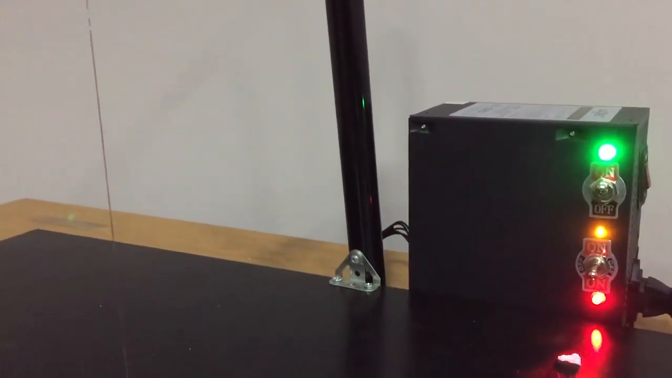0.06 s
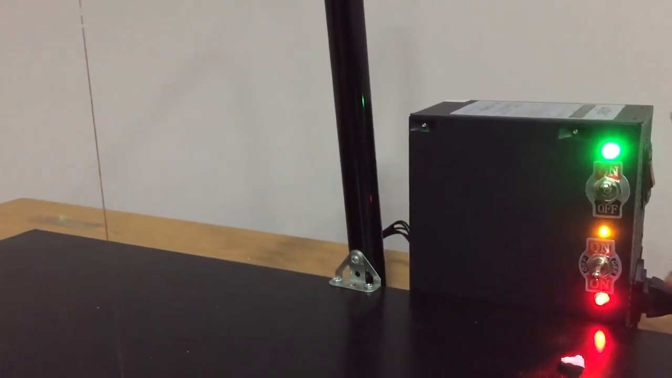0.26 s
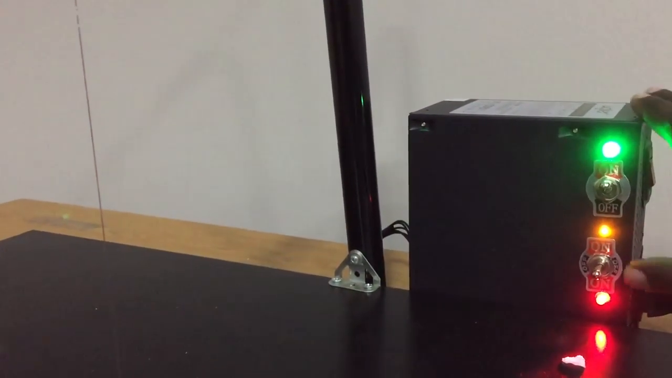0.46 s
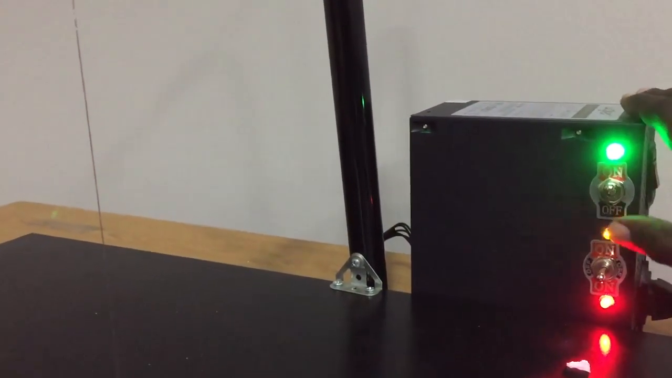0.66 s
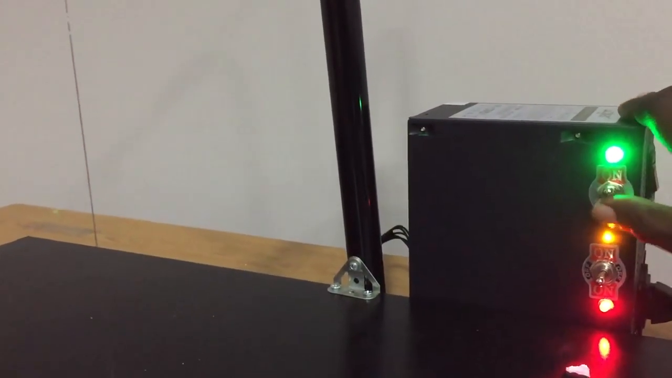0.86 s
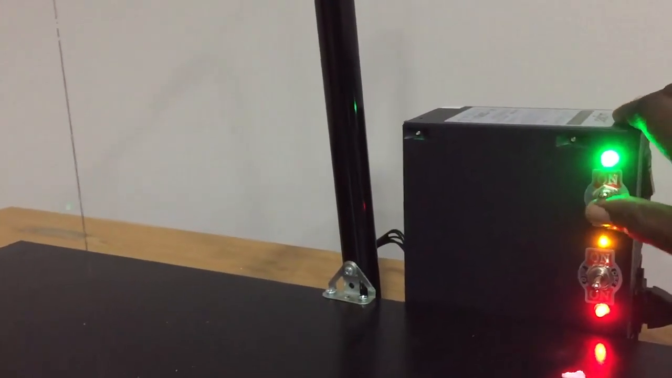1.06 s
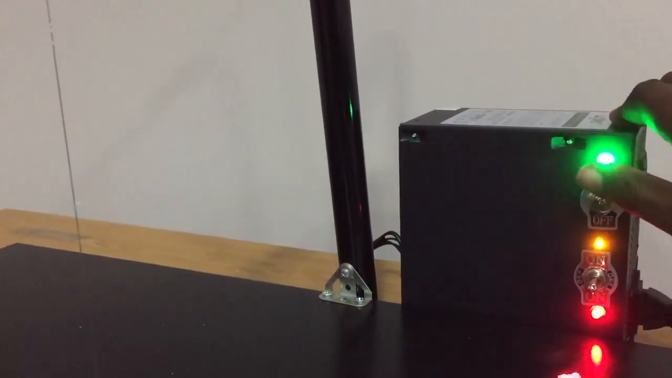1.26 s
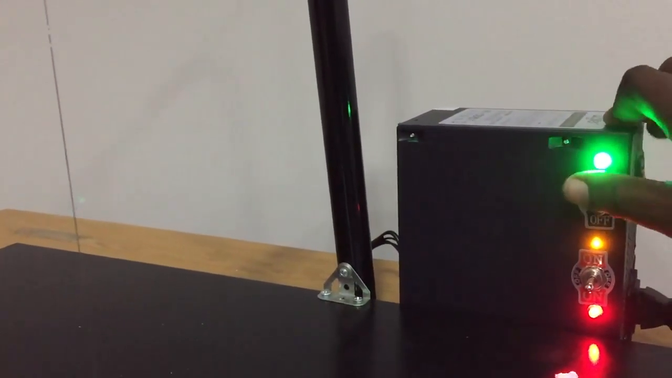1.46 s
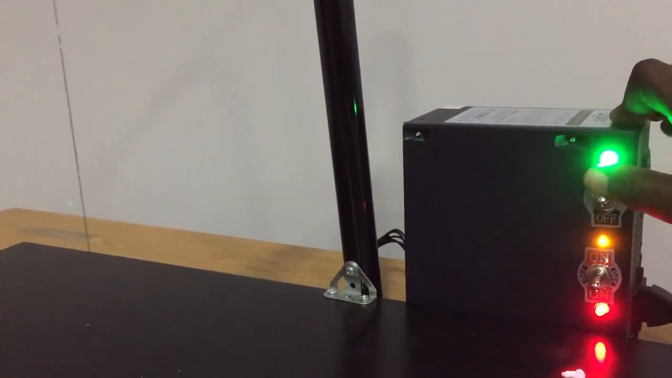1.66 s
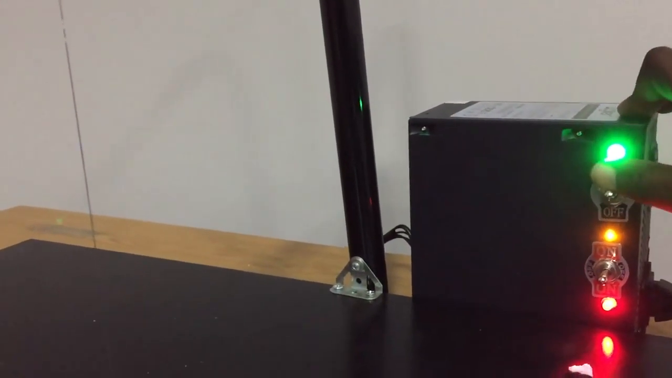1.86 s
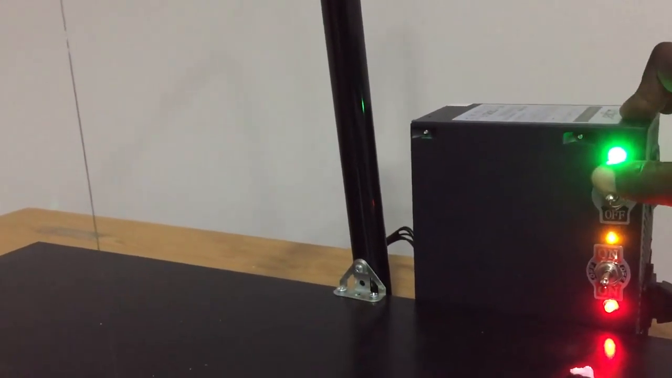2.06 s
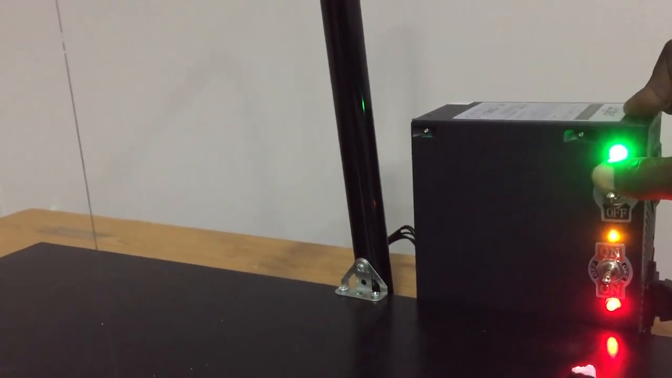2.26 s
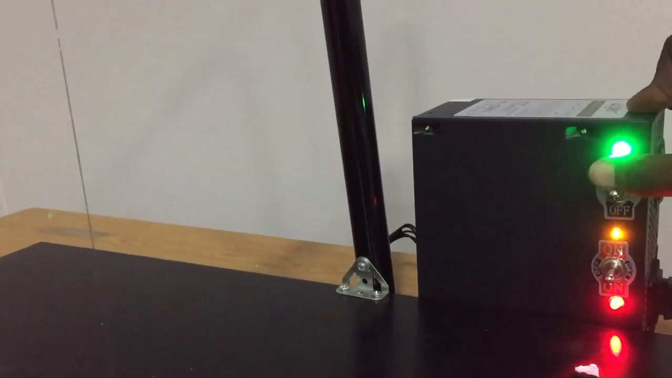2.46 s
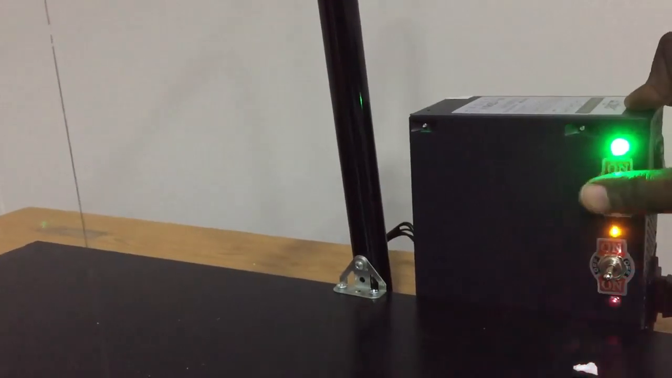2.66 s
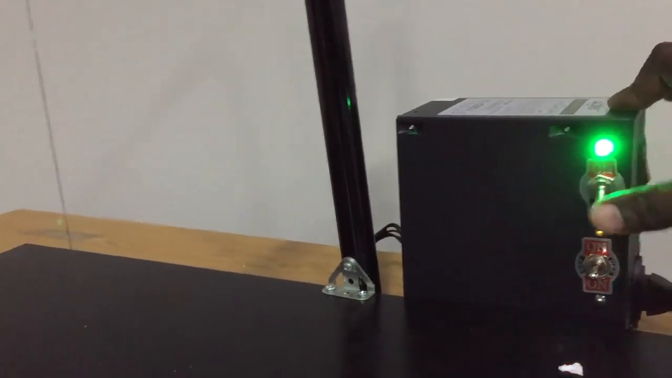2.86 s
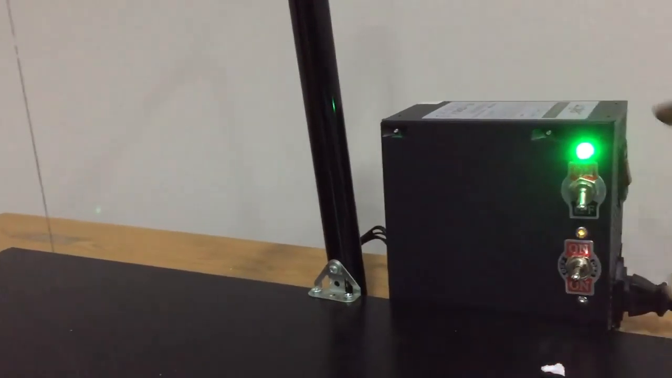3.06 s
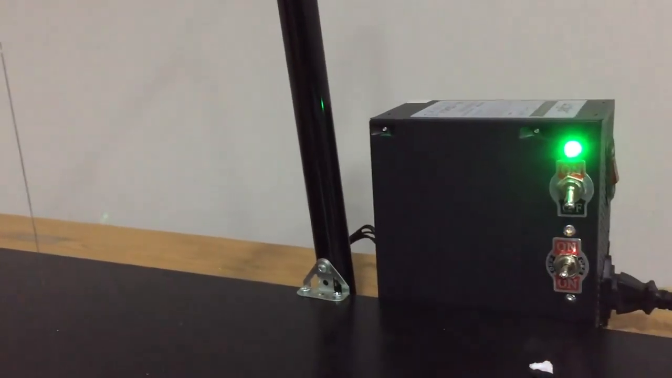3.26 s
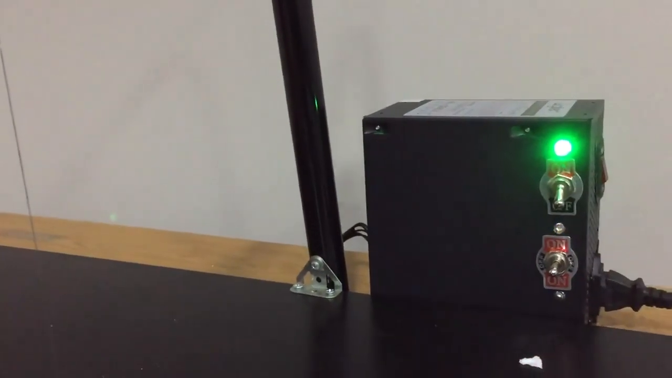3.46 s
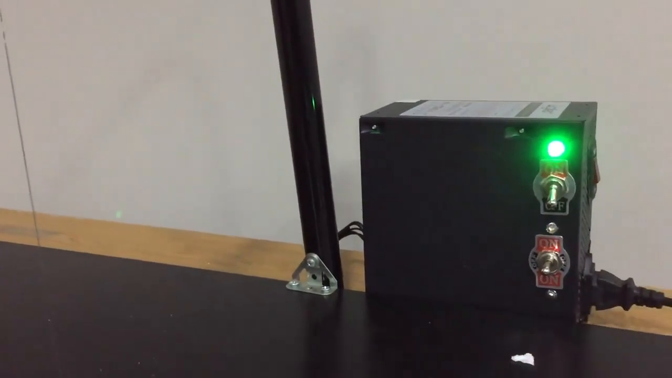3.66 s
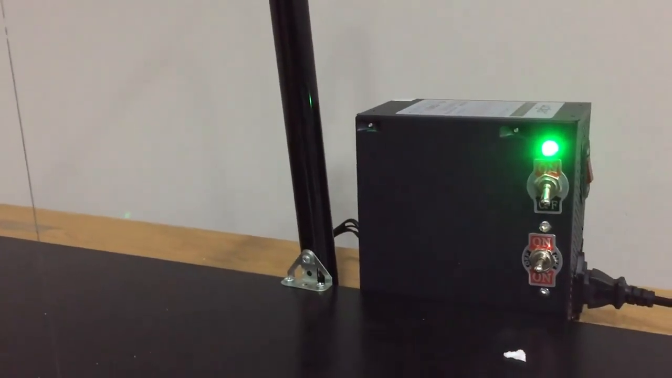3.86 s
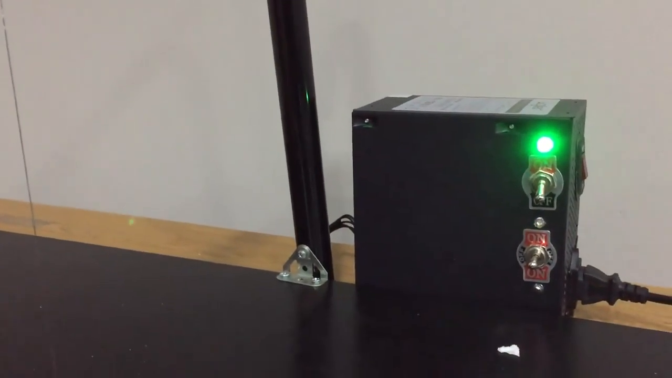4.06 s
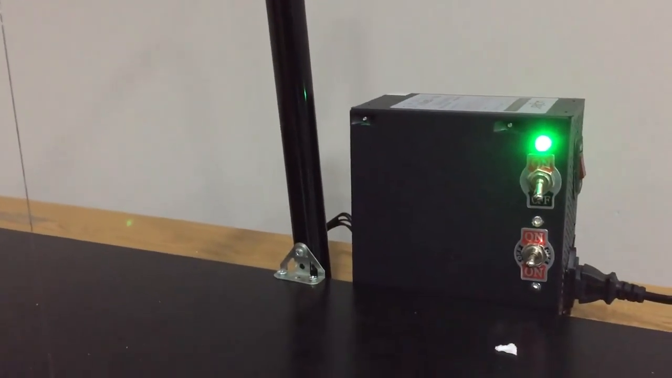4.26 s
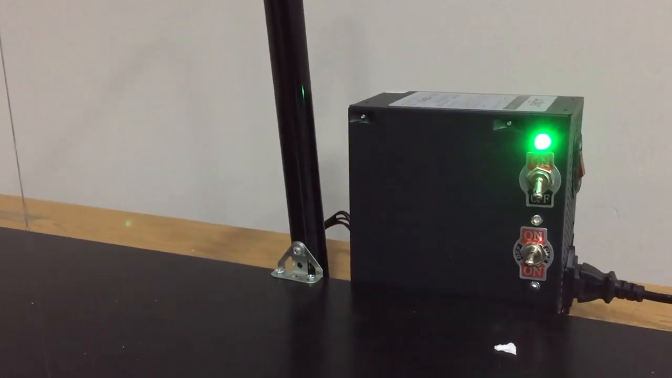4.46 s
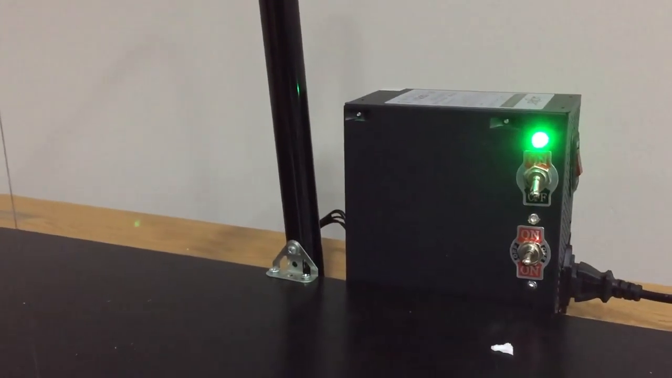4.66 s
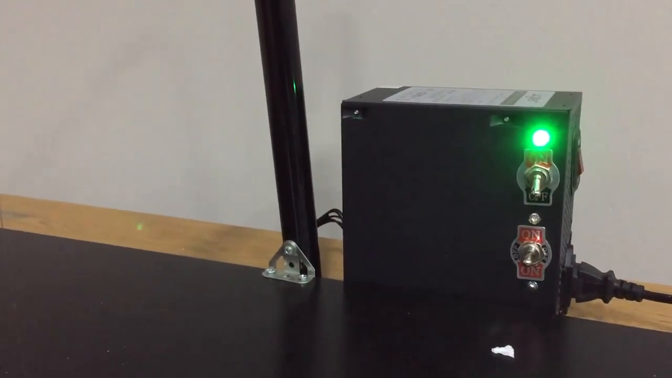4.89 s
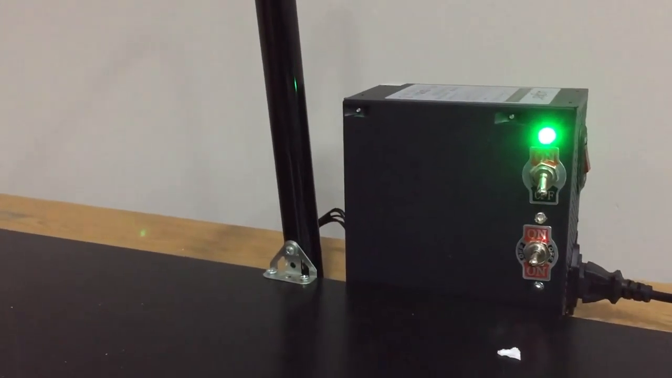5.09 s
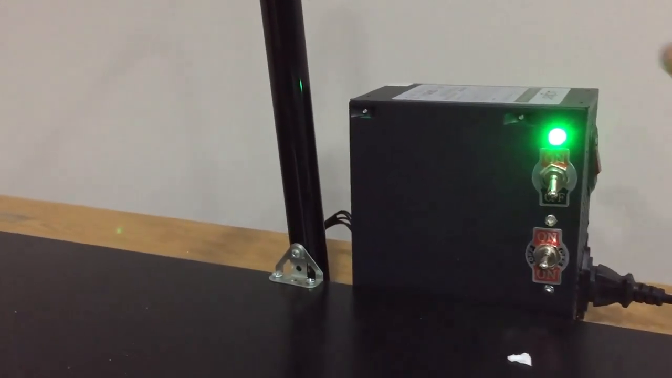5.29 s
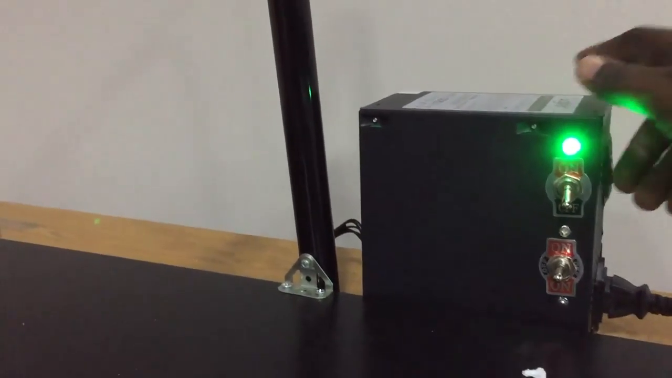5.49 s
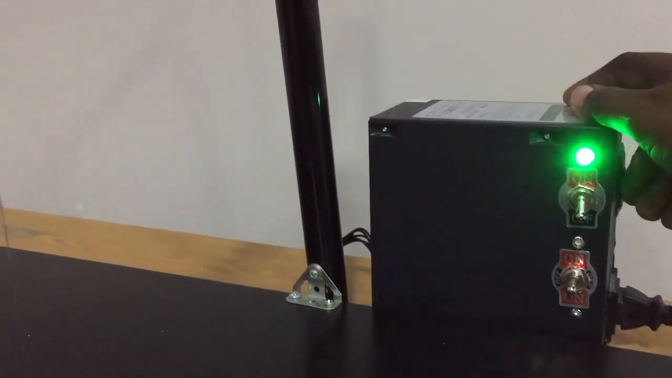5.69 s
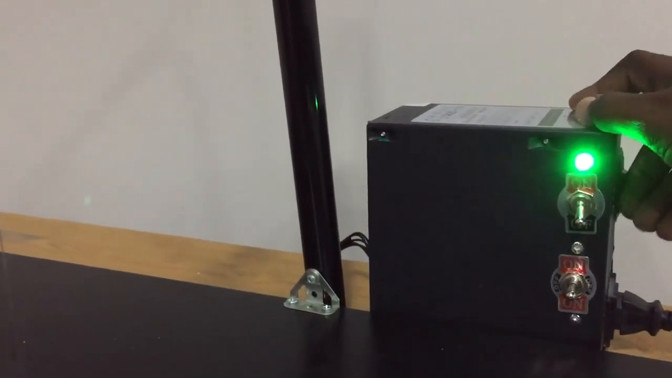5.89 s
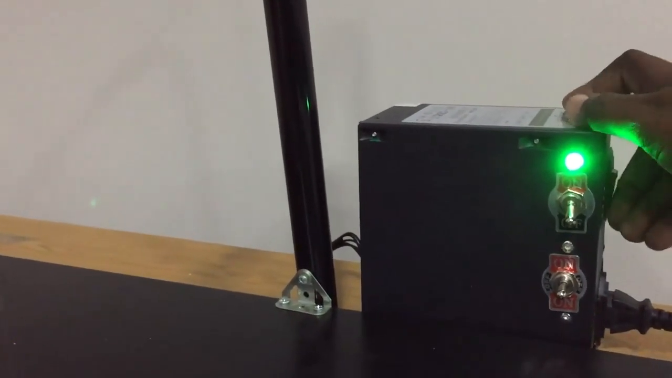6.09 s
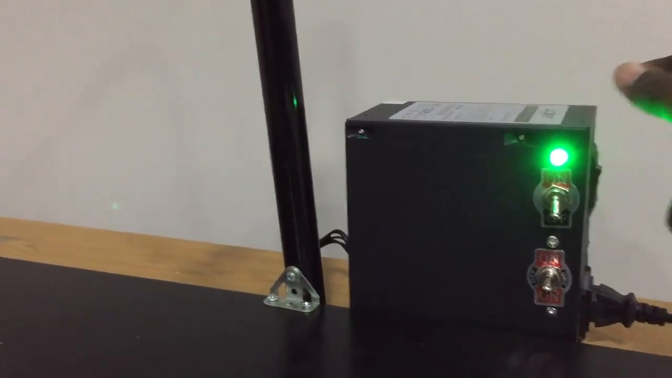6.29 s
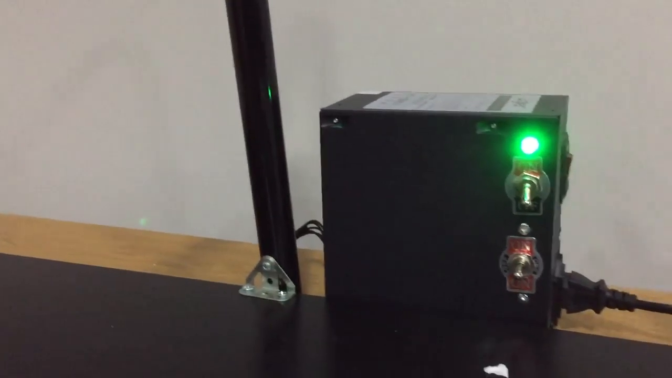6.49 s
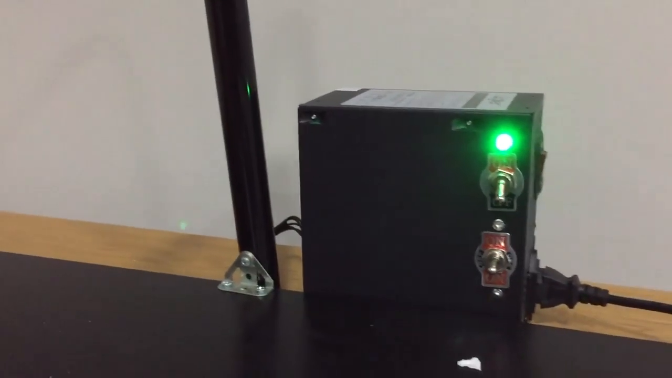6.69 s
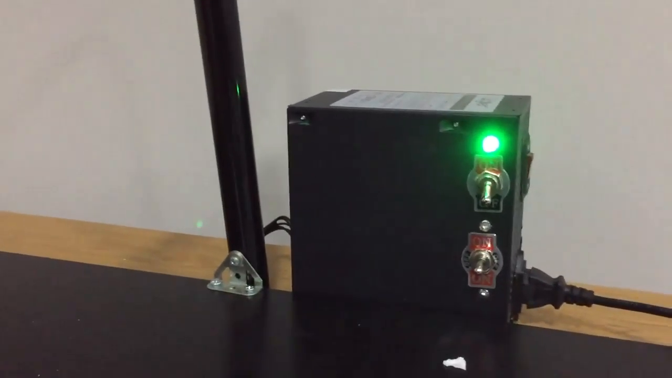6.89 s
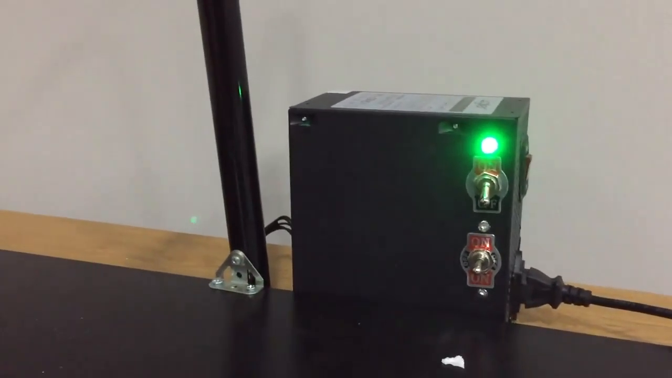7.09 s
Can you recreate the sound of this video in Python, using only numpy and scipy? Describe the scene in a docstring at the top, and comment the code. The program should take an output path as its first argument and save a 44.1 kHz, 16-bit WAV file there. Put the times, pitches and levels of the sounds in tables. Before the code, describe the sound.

A toggle switch snaps off a small power supply, its faint fan winds down, and a second switch clicks over low hum.

```python
"""A bare, ringing room, one microphone near a bench power supply made from a computer supply.
After a brief rustle a finger feels for the front toggle and snaps it off, and the fan coasts down;
later it clicks the rocker on the far side. Each switch is a spring throwing its contacts over,
and each blow knocks the steel case. Mains hum and the room's low rumble carry on underneath."""
import sys
import numpy as np
from scipy import signal
from scipy.fft import rfft, irfft
from scipy.io import wavfile

SR = 44100
rng = np.random.default_rng(int(sys.argv[2]) if len(sys.argv) > 2 else 0)


def master_out(mix):
    """Clip the mix to full scale and print it as 16-bit PCM to the path in sys.argv[1]."""
    frames = np.transpose(np.atleast_2d(mix))
    ceiling = np.clip(frames, -1, 1)
    pcm = np.round(ceiling * 32767).astype(np.int16)
    wavfile.write(sys.argv[1], SR, pcm)


N = 314863
T = np.arange(N) / SR
BAND_LIMIT_HZ = 15900


# blows inside the front toggle: start_s, snap_db, snap_decay_s, knock_db
TOGGLE_BLOWS = [(2.7427, -20, 0.00067, -15), (2.7447, -9.5, .0016, -11), (2.7462, -13.5, 0.001, -10),
                (2.7480, -19, .002, 3)]
# its snap, straight to the microphone: frequency_hz, level_db
TOGGLE_SPECTRUM = [(60, -30.5), (200, -13), (1200, -0.5), (2800, -0.5), (4300, 1), (6600, 3), (8200, -4.5),
                   (9500, 1), (15500, -3)]
# its echo, back from the walls: frequency_hz, level_db
TOGGLE_ECHO_SPECTRUM = [(53, -42), (90, -12), (210, 3), (290, -10), (467, -8.5), (510, -19.5), (568, -10),
                        (821, -14), (1040, -8), (1640, -11.5), (1790, -12), (2430, -10.5), (3080, -21.5),
                        (6580, -24.5), (16000, -37)]

def toggle(room_db=-17.5):
    """The front toggle snaps over, facing the microphone, and the room rings."""
    click = switch_blows(TOGGLE_BLOWS, TOGGLE_SPECTRUM)
    echo = snap_echo(TOGGLE_BLOWS, TOGGLE_ECHO_SPECTRUM, level_db=-35, build_s=0.005,
                     t60_scale=1.062, linger_db=3.5, linger_s=0.38)
    return click + amp(room_db) * room(click) + echo


# blows inside the rear rocker: start_s, snap_db, snap_decay_s, knock_db
ROCKER_BLOWS = [(6.0553, -13, 0.0017, -27), (6.0565, -11.5, 0.00159, -17.5), (6.0583, -27.5, 0.0035, -16.5)]
# its snap, from behind the case: frequency_hz, level_db
ROCKER_SPECTRUM = [(60, -48), (200, -16), (1000, -10), (2100, -11), (3100, 5), (4600, -4), (6300, 0),
                   (8500, -4.5), (11000, -6.5), (14800, -1)]
# its echo, back from the walls: frequency_hz, level_db
ROCKER_ECHO_SPECTRUM = [(88, -44), (150, -13), (217, 0), (309, -13), (383, -5), (504, -30), (675, -10.5),
                        (774, -16.5), (1630, -9.5), (2920, -6), (4410, -18.5), (5790, -9.5), (10400, -13.5),
                        (12900, -7.5), (16000, -21)]

def rocker(room_db=-17.5):
    """The rear rocker clicks facing away from the microphone, so its echo builds more slowly."""
    click = switch_blows(ROCKER_BLOWS, ROCKER_SPECTRUM)
    echo = snap_echo(ROCKER_BLOWS, ROCKER_ECHO_SPECTRUM, level_db=-44, build_s=0.012,
                     t60_scale=0.87, linger_db=1.5, linger_s=0.2)
    return click + amp(room_db) * room(click) + echo


def switch_blows(blows, spectrum):
    """Switch parts strike a few ms apart: each blow is a snap of noise and a knock on the case."""
    out = noise(spectrum) * bursts([row[:3] for row in blows])
    for start_s, _, _, knock_db in blows:
        add(out, start_s, amp(knock_db) * case_ring())
    return out


# steel case modes, ending with the thin cover's faint, long ring: pitch_hz, level_db, t60_s
CASE_MODES = [(112, -47.5, .2), (186.56, -27, 0.13), (226.3, -30, .4), (263, -37.5, 0.043),
              (362, -31.5, 0.086), (398, -28, .12), (636, -29.5, .05), (694, -21.5, .085),
              (925, -30.5, 0.15), (975, -22.5, 0.083), (1106, -27.5, .07), (1261.7, -20.5, 0.06),
              (1330, -28, 0.052), (1683, -21, .085), (1900, -35.5, 0.14), (2270, -38, 0.13),
              (2436, -26.5, .045), (3370, -36, 0.062), (4550, -38, 0.042), (5340, -34.5, 0.021),
              (5570, -37, .06), (6780, -28, 0.034), (7420, -36, .05), (1286, -44, 1), (1680, -46.5, 0.96),
              (2490, -47, 1), (6764, -51.5, 1)]
# clatter of the panels: frequency_hz, level_db
PANEL_SPECTRUM = [(60, -21), (170, 0), (500, -9.5), (1000, 2), (2200, -2.5), (3300, -9), (6000, -18),
                  (10000, -30), (16000, -36)]

def case_ring(panel_db=-17, panel_decay_s=0.0047):
    """One blow on the case: its clear modes plus a short clatter of dense panel modes."""
    t = T[:SR // 2]
    modes = sum((-1) ** k * amp(db) * np.exp(-np.log(1000) * t / t60) * np.sin(2 * np.pi * hz * t)
                for k, (hz, db, t60) in enumerate(CASE_MODES))
    clatter = unit(colour(rng.standard_normal(len(t)), PANEL_SPECTRUM))
    return modes + amp(panel_db) * clatter * np.exp(-t / panel_decay_s)


# the toggle's lever taking up its slack: start_s, snap_db, snap_decay_s, knock_db
LEVER_BLOWS = [(1.4395, -30.5, 0.0029, -42), (1.4463, -42, 0.0026, -36)]
# the duller snap of those blows: frequency_hz, level_db
LEVER_SPECTRUM = [(88, -26), (200, -4), (380, 8.5), (520, -9), (972, 3.5), (1510, -6), (1730, -3.5),
                  (2810, -5.5), (3340, 0.5), (3670, -13), (6430, -19.5), (15000, -44)]

def lever(room_db=-13, desk_db=-9, desk_decay_s=0.015):
    """The lever taps its stop without switching; the nearby desk and wall scatter the tap back."""
    tap = switch_blows(LEVER_BLOWS, LEVER_SPECTRUM)
    t = T[:SR // 5]
    scatter = rng.standard_normal(len(t)) * np.exp(-t / desk_decay_s)
    near_echo = signal.fftconvolve(tap, scatter / np.linalg.norm(scatter))[:N]
    return tap + amp(desk_db) * near_echo + amp(room_db) * room(tap)


# soft fingertip thuds on lever and case: start_s, level_db, decay_s, pitch_hz
FINGERTIP_THUDS = [(.924, -42, 0.0056, 300), (1.603, -52, 0.015, 540), (2.364, -53, 0.029, 420),
                   (2.565, -53, 0.0081, 350), (2.882, -38.5, 0.013, 370), (5.731, -46, 0.0043, 170),
                   (5.919, -40.5, 0.0057, 310), (5.967, -49.5, 0.0093, 190)]
# fingernail ticks and grazes: start_s, level_db, decay_s, pitch_hz
NAIL_TICKS = [(1.595, -67.5, 0.016, 6500), (1.992, -76, .06, 11000), (2.951, -30, 0.0038, 2800),
              (3.401, -65.5, 0.009, 7000), (5.777, -66.5, .01, 6700)]
# skin squeaks as the hand grips the case: start_s, level_db, pitch_hz
SKIN_SQUEAKS = [(5.776, -61, 2250), (5.889, -62.5, 1793)]

def fingers(room_db=-12):
    """Low thuds from the fingertip, high ticks from the nail, narrow squeaks from gripping skin."""
    out = np.zeros(N)
    for start_s, db, decay_s, hz in FINGERTIP_THUDS:
        add(out, start_s, contact(db, hz, decay_s, octaves=0.92, case_db=-13))
    for start_s, db, decay_s, hz in NAIL_TICKS:
        add(out, start_s, contact(db, hz, decay_s, octaves=1.3, case_db=-14))
    for start_s, db, hz in SKIN_SQUEAKS:
        add(out, start_s, contact(db, hz, decay_s=0.013, octaves=0.17, case_db=-20))
    return out + amp(room_db) * room(out)


def contact(db, hz, decay_s, octaves, case_db, damping_s=0.028):
    """One short scraping contact in a band around hz, which also rings the case."""
    t = T[:SR // 5]
    edges_hz = np.minimum(hz * 2 ** (np.array([-0.5, 0.5]) * octaves), BAND_LIMIT_HZ)
    scrape = rng.standard_normal(len(t)) * np.exp(-t / decay_s)
    push = signal.lfilter(*signal.butter(2, edges_hz, "band", fs=SR), scrape)
    push *= np.sqrt(decay_s * SR / 2) / np.linalg.norm(push)  # energy grows with the contact time
    ring = signal.fftconvolve(push, case_ring())[:len(t)] * np.exp(-t / damping_s)  # skin damps steel
    return amp(db) * (push + amp(case_db) * unit(ring) * np.std(push))


# resonances of the sliding hand: pitch_hz, width_hz, level_db
SLIDE_RESONANCES = [(2630, 34, 6.5), (3210, 66, -3), (4060, 320, 1.5), (5520, 280, -2), (6150, 200, -1),
                    (6830, 130, 6), (7560, 220, 0), (9060, 870, -5.5), (13400, 1900, -10),
                    (15500, 550, -3.5)]
# rasp of its catches: frequency_hz, level_db
CATCH_SPECTRUM = [(300, -39), (1200, -6), (1900, -18), (2900, -10), (3300, 9), (4000, 3), (4800, -6.5),
                  (6000, -10), (8000, -3), (9200, -14), (10500, -6.5), (13000, -22), (15500, -8.5)]

def rustle(press_s=0.24, ease_s=0.34, lift_s=0.433, lift_decay_s=0.018,
           slide_db=-60.5, ease_db=-2, grain_db=1.0, room_db=-17):
    """Friction grains pass through resonances as the hand slides, presses, eases and lifts off."""
    grains = rng.standard_normal(N) * amp(grain_db * drift(270))
    slide = sum((-1) ** k * amp(db) * signal.lfilter(*signal.iirpeak(hz, hz / width, fs=SR), grains)
                for k, (hz, width, db) in enumerate(SLIDE_RESONANCES))
    lift_off = np.exp(-np.maximum(T - lift_s, 0) / lift_decay_s)
    slide = unit(slide) * amp(slide_db + ease_db * (T > ease_s)) * lift_off
    slips = colour(grains * catches(press_s, ease_s), CATCH_SPECTRUM)
    slips /= np.std(colour(grains, CATCH_SPECTRUM))
    return slide + slips + amp(room_db) * room(slide + slips)


# the hand's sharpest catches: start_s, level_db
SHARP_CATCHES = [(.244, -45.5), (.2668, -43.5), (0.2844, -42.5), (0.2978, -39.5), (0.368, -50), (.377, -47),
                 (0.441, -43)]

def catches(press_s, ease_s, faint_per_s=78, faint_db=-52.5, spread_db=2.5, decay_s=0.0061):
    """Envelope of stick and slip: a few sharp catches, and faint random ones while the hand presses."""
    draws = rng.random((round(faint_per_s * (ease_s - press_s)), 2))
    faint = [(press_s + (k + when) / faint_per_s, faint_db + spread_db * (2 * size - 1))
             for k, (when, size) in enumerate(draws)]
    return np.sqrt(sum(bursts([(start_s, db, decay_s)]) ** 2 for start_s, db in SHARP_CATCHES + faint))


# air rushing through the fan: frequency_hz, level_db
FAN_SPECTRUM = [(60, -6), (100, -0.5), (200, -6.5), (330, -8), (450, -13), (620, -3.5), (900, -11.5),
                (1500, -20.5), (2600, -30), (4000, -34), (8000, -46)]

def fan(blade_hz=593.5, off_s=2.75, coast_s=0.4, tone_db=-65, air_db=-63, waver=0.0018, flutter_db=5.5):
    """Fluttering blade tone and rushing air, coasting down once the toggle cuts the power."""
    speed = np.exp(-np.maximum(T - off_s, 0) / coast_s)
    blade_passes = np.cumsum(blade_hz * speed * (1 + waver * drift(23))) / SR
    flutter = amp(flutter_db * np.minimum(drift(13), 1))
    tone = unit(np.sin(2 * np.pi * blade_passes) * flutter)
    return speed ** 2 * (amp(tone_db) * tone + amp(air_db) * noise(FAN_SPECTRUM))


# partials of the mains hum: harmonic_number, level_db
MAINS_HZ, HUM_PARTIALS = 59.54, [(1, -71.5), (2, -67.5), (3, -77.5), (4, -76), (6, -86.5)]

def mains_hum(waver_db=2.0):
    """The mains hums throughout, each harmonic wavering a little in level."""
    return sum(amp(db + waver_db * drift(6.8))
               * unit(np.sin(2 * np.pi * (k * MAINS_HZ * T + rng.random()))) for k, db in HUM_PARTIALS)


# faint electrical tones: pitch_hz, level_db
WHINE_TONES = [(3413, -79), (10993, -101)]

def whine(on_s=1.25, off_s=2.37, fade_s=0.17):
    """A thin electrical whine fades in and out while the finger rests on the lever."""
    tones = sum(amp(db) * unit(np.sin(2 * np.pi * hz * T + 0.4 * drift(19))) for hz, db in WHINE_TONES)
    return tones * np.clip(np.minimum(T - on_s, off_s - T) / fade_s, 0, 1)


# ring of the bare room: frequency_hz, t60_s
ROOM_DECAY = [(100, 1), (250, .85), (700, 1.1), (1800, 1.1), (3500, 1.0), (7000, .8), (11000, .6),
              (15500, .52)]

def reflections(build_s, t60_scale=1):
    """Dense reflections of energy 1 that build up, then die faster in the treble."""
    t = T[:SR * 3 // 2]
    hz, frame_s, spectra = signal.stft(rng.standard_normal(len(t)), SR, nperseg=512)
    t60_s = t60_scale * read(ROOM_DECAY, hz)[:, None]
    spectra *= np.exp(-np.log(1000) * frame_s / t60_s)
    tail = signal.istft(spectra, SR, nperseg=512)[1][:len(t)] * (1 - np.exp(-t / build_s))
    return tail / np.linalg.norm(tail)


def room(x):
    """A sound as the walls return it to the microphone."""
    return signal.fftconvolve(x, reflections(build_s=0.003))[:N]


def snap_echo(blows, spectrum, level_db, build_s, t60_scale, linger_db, linger_s):
    """A snap leaves the case in all directions and returns as one tail, lingering around linger_s."""
    tail = colour(reflections(build_s, t60_scale), spectrum)
    age = (T[:len(tail)] / linger_s) ** 2
    gain = amp(level_db + linger_db * age * np.exp(1 - age))
    out = np.zeros(N)
    add(out, blows[1][0], gain * tail / np.std(tail[:SR // 10]))  # starts with the second blow
    return out


# still air all round the microphone: frequency_hz, level_db
ROOM_TONE_SPECTRUM = [(22, -16), (31, -10), (42, -4), (55, 2), (85, -7.5), (150, -13.5), (300, -22.5),
                      (1000, -28), (4000, -32.5), (4900, -36), (6000, -35), (9300, -39.5), (10400, -41.5),
                      (15500, -41)]

def room_tone(level_db=-62.5):
    """Low rumble and faint hiss of the room."""
    return amp(level_db) * noise(ROOM_TONE_SPECTRUM)


def amp(db):
    """Decibels to gain."""
    return 10 ** (np.asarray(db) / 20)


def unit(x):
    """Scales to rms 1."""
    return x / np.sqrt(np.mean(x ** 2) + 1e-20)


def read(points, hz):
    """Reads a table on a log-frequency axis."""
    table_hz, value = np.transpose(points)
    return np.interp(np.log(hz + 1), np.log(table_hz + 1), value)


def add(mix, start_s, sound):
    """Mixes a sound in at start_s."""
    part = mix[round(start_s * SR):][:len(sound)]
    part += sound[:len(part)]


def colour(x, spectrum, size=4096):
    """Minimum-phase filter with the given spectrum."""
    log_gain = np.log(amp(read(spectrum, abs(np.fft.fftfreq(size, 1 / SR)))))
    taps = np.fft.ifft(np.exp(np.conj(signal.hilbert(log_gain)))).real
    return signal.oaconvolve(x, taps[:size // 2])[:len(x)]


def noise(spectrum):
    """Steady noise of rms 1 with the given spectrum."""
    gain = amp(read(spectrum, np.fft.rfftfreq(N, 1 / SR)))
    return unit(irfft(rfft(rng.standard_normal(N)) * gain, N))


def drift(hz):
    """Random wander of rms 1, slower than hz."""
    return unit(irfft(rfft(rng.standard_normal(N)) * (np.fft.rfftfreq(N, 1 / SR) < hz), N))


def bursts(rows):
    """Envelope of sudden, dying bursts."""
    out = np.zeros(N)
    for start_s, db, decay_s in rows:
        add(out, start_s, amp(db) * np.exp(-T[:SR // 5] / decay_s))
    return out


def scene():
    """In mono at the bench: switches and hand in front; fan, hum, whine and room tone beneath."""
    handling = toggle() + rocker() + lever() + fingers() + rustle()
    return (handling + fan() + mains_hum() + whine() + room_tone())[None]


def record(dry, bass_cut_hz=40):
    """The microphone's bass cut and the recorder's band limit."""
    bass_cut = signal.butter(4, bass_cut_hz, "high", fs=SR, output="sos")
    band_limit = signal.firwin(511, BAND_LIMIT_HZ, window=("kaiser", 9), fs=SR)
    return signal.oaconvolve(signal.sosfilt(bass_cut, dry), band_limit[None], "same")


dry = scene()
out = record(dry)
master_out(out)
```